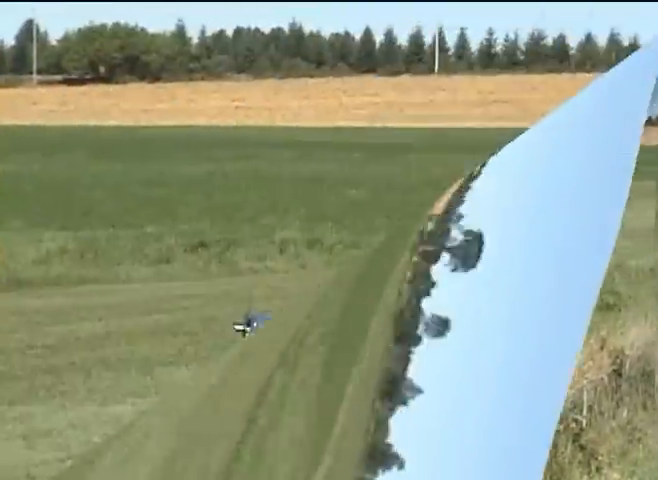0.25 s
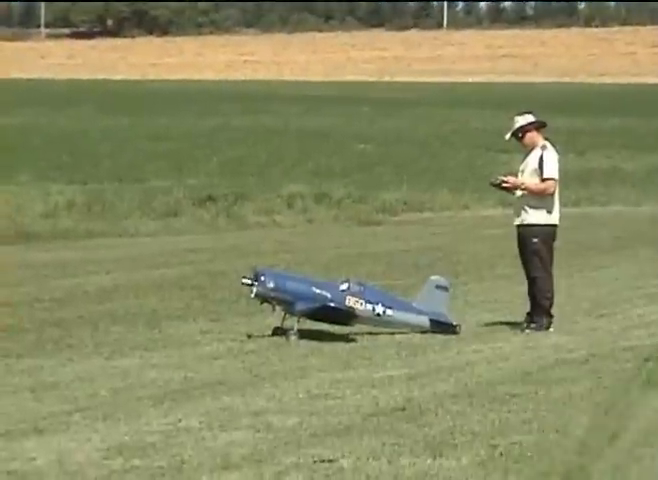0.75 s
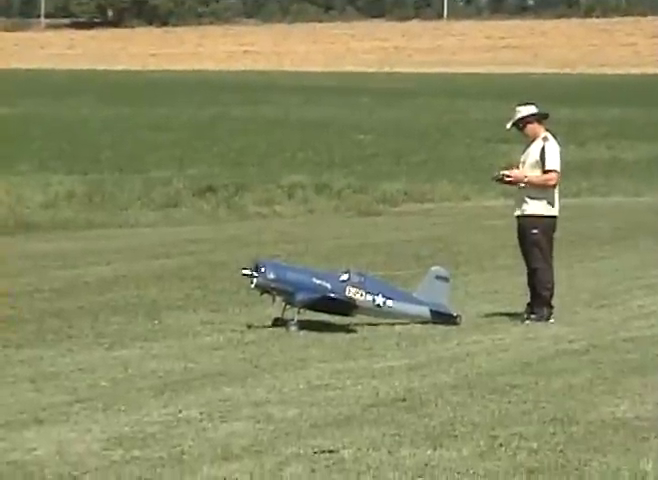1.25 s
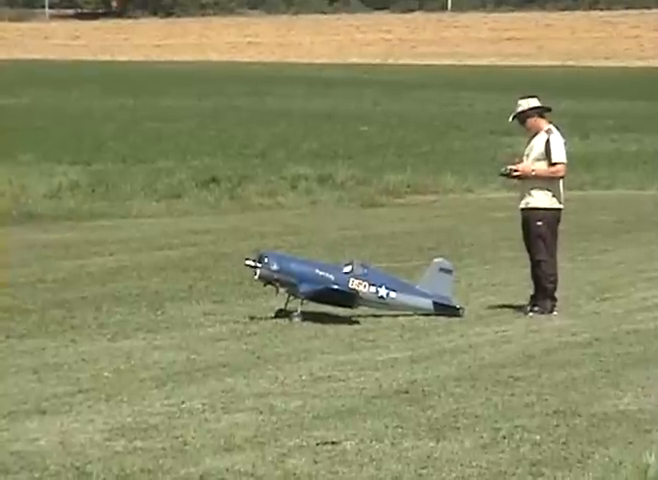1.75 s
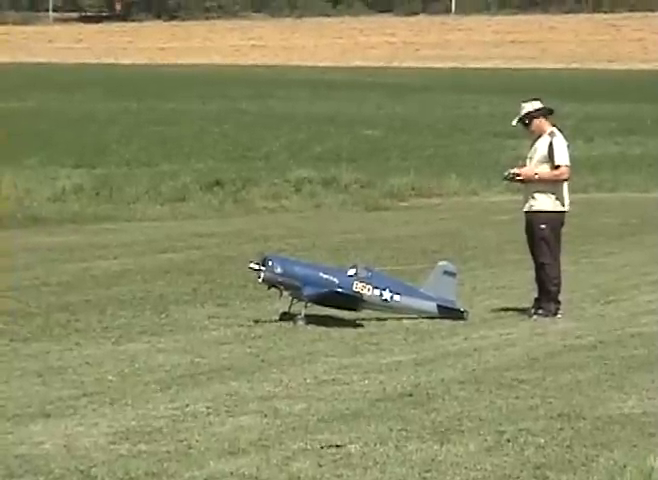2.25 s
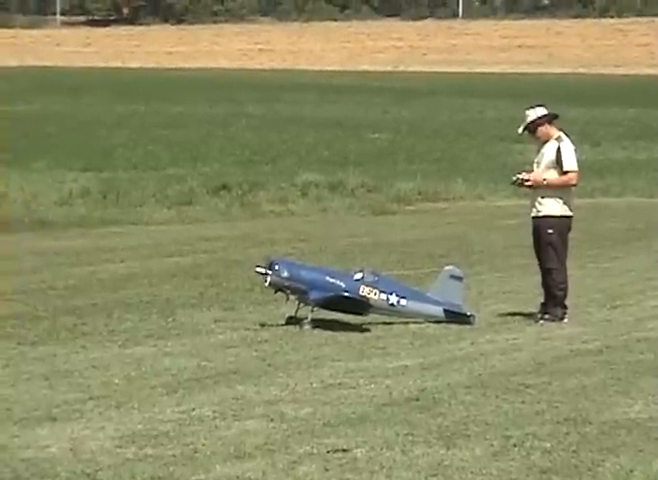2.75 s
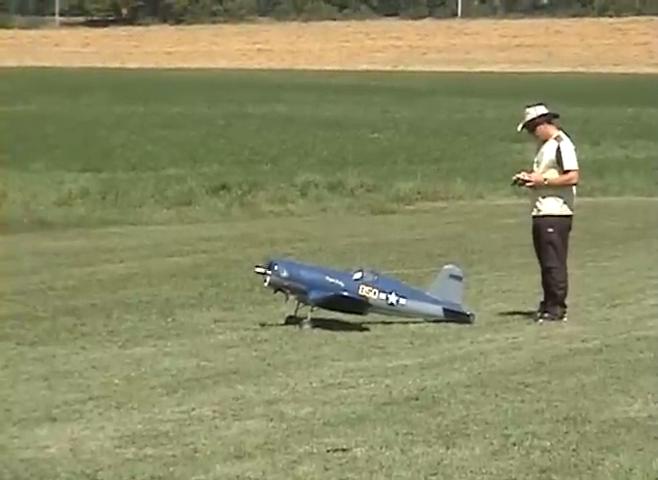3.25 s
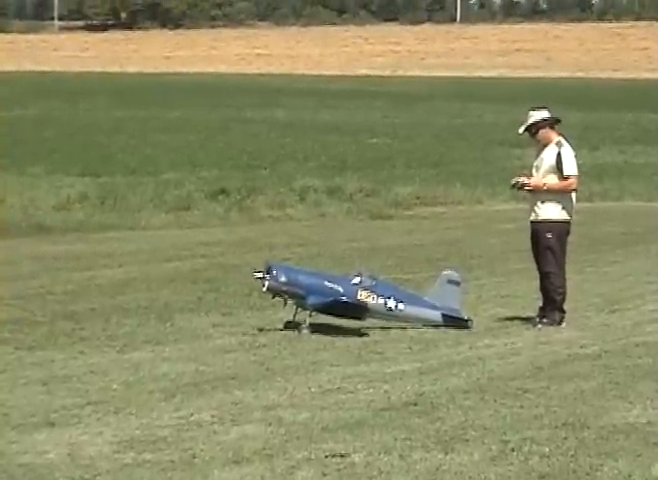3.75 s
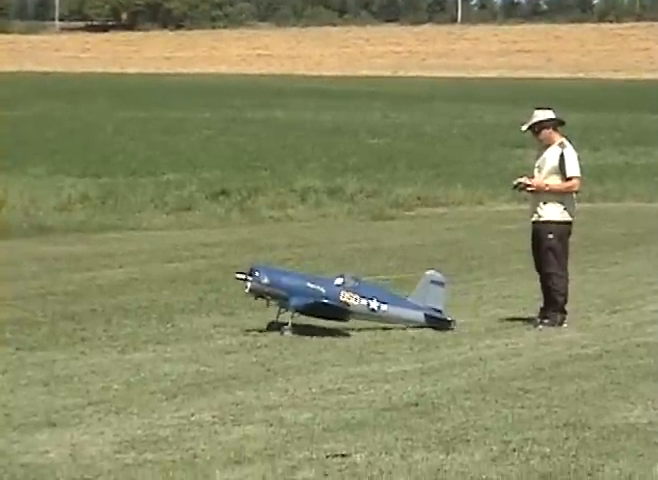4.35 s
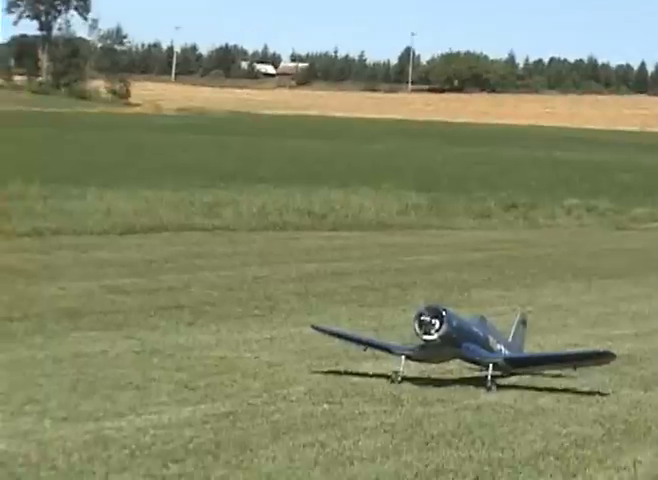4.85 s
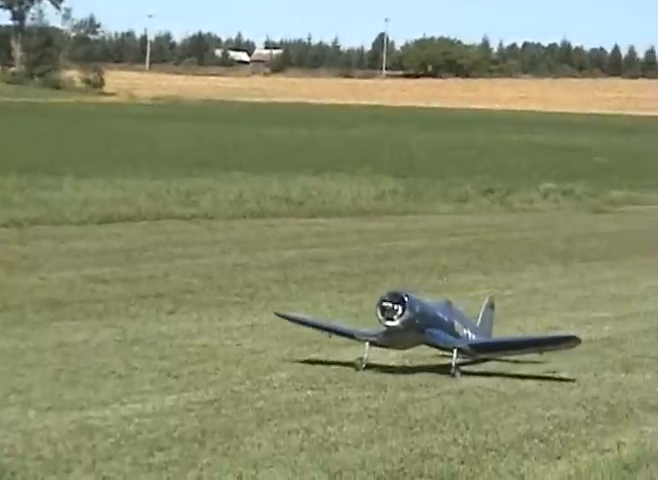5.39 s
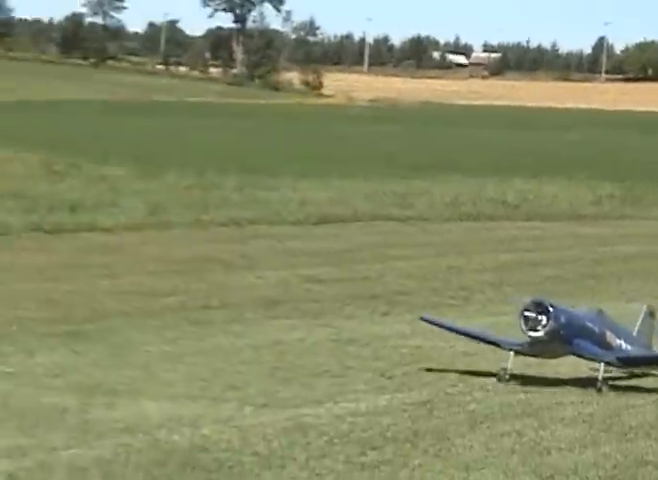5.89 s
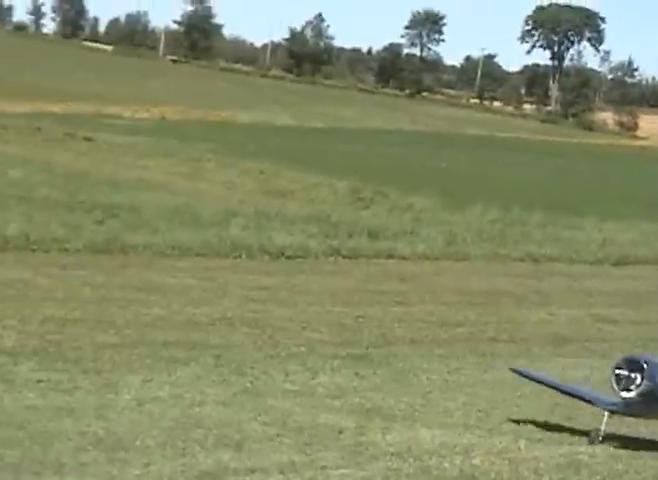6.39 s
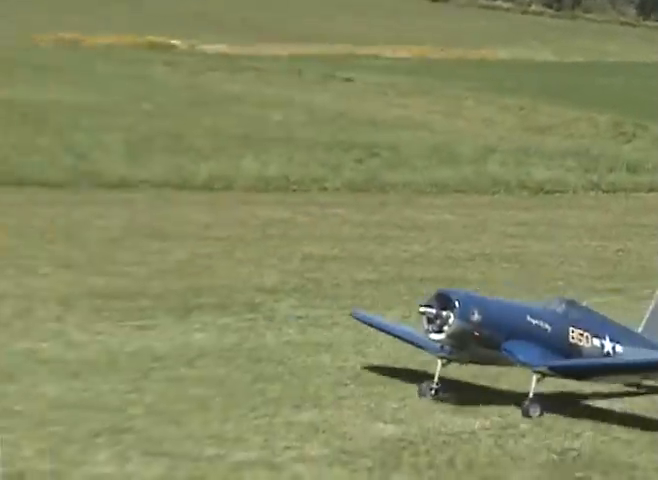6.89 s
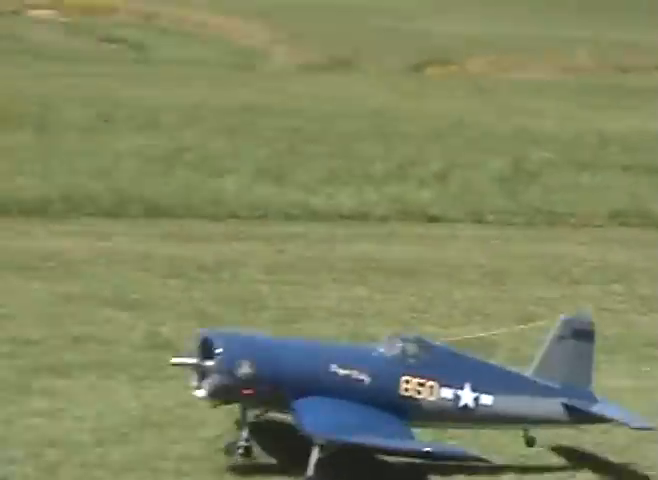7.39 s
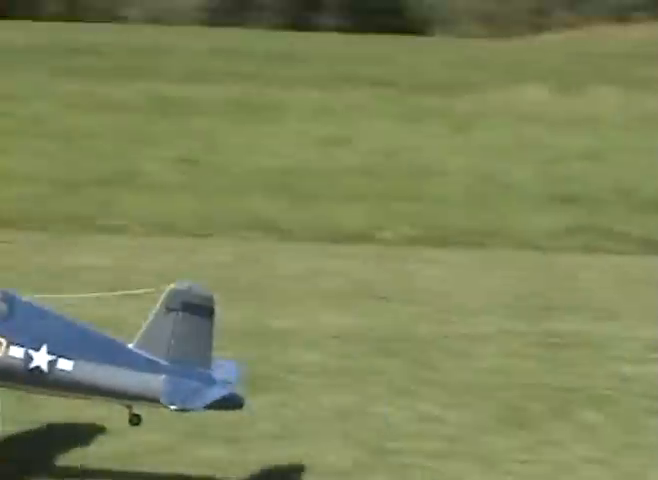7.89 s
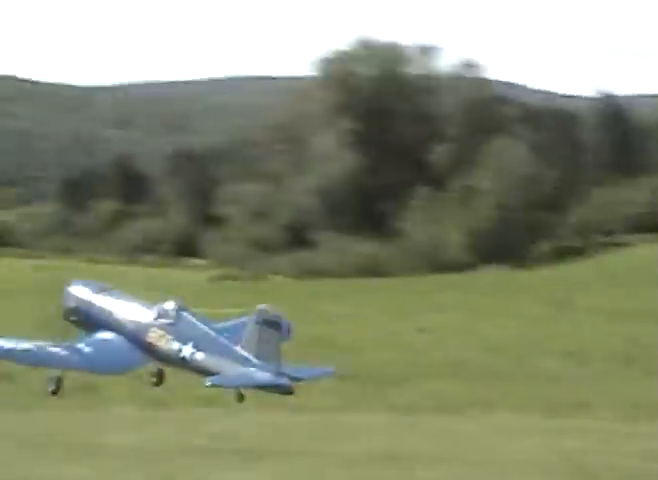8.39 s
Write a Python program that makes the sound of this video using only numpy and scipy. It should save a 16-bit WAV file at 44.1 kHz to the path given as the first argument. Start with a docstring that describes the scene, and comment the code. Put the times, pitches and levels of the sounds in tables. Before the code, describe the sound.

Soft open-field air and thin, high cricket trills lie under everything, with a nearer cricket chirping in short bursts. From 0 s a small two-stroke model plane engine idles: hollow low pops, slightly irregular, about fifteen a second, with a faint propeller thrum. A brighter, noisy engine rasp fades out by 1 s. A tiny wind puff touches the microphone near 2 s. Around 3.7 s the idle quickens, firing faster and unevenly with a low hum. At 4.7 s the throttle snaps open: crackling, spluttering misfires, then the pitch climbs in steps, thumps merging into a drone by 5.8 s. It holds near 6.3-6.9 s, rises again to about 7.5 s, loud, metallic and hissing as the plane passes close. A resonance in the rasp rises, then slides down; by 8.5 s the hiss and buzz dull while a strong hollow bark continues to the end.

```python
"""A grass field with soft air and crickets, heard through two microphone ports. From the start a model
aeroplane's two-stroke idles, its clicks at uneven firings ringing its silencer; a separate brighter, noisier
engine sound, made of shaped noise, fades within about a second. Near 3.7 s the idle quickens and hums. At 4.7 s
the throttle snaps open; one pulse a turn drives bark, buzz and jet noise, stumbling, then winding up. The low
thumps merge into a drone; the exhaust turns from nose-on to side-on, and ends tail-on."""
import sys
import numpy as np
from scipy import signal
from scipy.fft import rfft, irfft, next_fast_len
from scipy.io import wavfile
from scipy.ndimage import uniform_filter1d

SR = 44100
rng = np.random.default_rng(int(sys.argv[2]) if len(sys.argv) > 2 else 0)


def inscribe(sig):
    """Save sig as 16-bit PCM at rate SR to the path in sys.argv[1].

    A 1-D sig is mono; a 2-D sig holds one channel per row.
    Samples are clipped to [-1, 1] before scaling.
    """
    pcm = np.round(np.clip(np.atleast_2d(sig).T, -1, 1) * 32767)
    wavfile.write(sys.argv[1], SR, pcm.astype(np.int16))


N = 380583
TIME = np.arange(N) / SR

# open air of the field: [freq_hz, relative_db]
FIELD_AIR = [(20, -9), (60, 4.5), (130, 1.5), (350, -12.5), (520, -7.5), (780, -6), (1300, -8.5),
             (2300, -16), (4300, -21.5), (5200, -12.5), (6800, -29.5), (8600, -12.5), (9800, -26),
             (14000, -39)]
# low puff of wind on the microphone: [freq_hz, relative_db]
GUST_COLOUR = [(15, -19), (40, -5), (80, -4), (160, -14), (600, -70)]
# small sharp ticks: [start_s, relative_db], and their colour: [freq_hz, relative_db]
TICKS = [(4.0092, -25.5), (6.5214, -22), (8.3459, -33)]
TICK_COLOUR = [(500, -20), (3000, 4), (14000, 3)]
# wing-stroke bursts of the near cricket: [first_stroke_s, last_stroke_s, relative_db]
CRICKET_BURSTS = [(.115, 0.15, -34), (.81, .885, -46), (1.274, 1.346, -42), (1.917, 2.035, -43.5),
                  (2.533, 2.675, -47), (2.703, 2.785, -37), (2.939, 3.013, -44), (3.344, 3.449, -34),
                  (3.646, 3.674, -45), (4.154, 4.226, -35.5)]
STROKES_PER_S = 28

# crank speed at idle: [time_s, turns_per_s]
IDLE_SPEED = [(0, 55.5), (.66, 64), (.72, 39.5), (1.7, 40.7), (2.2, 44), (3.73, 43), (3.93, 56.6),
              (4.67, 58)]
# runs of even firing at idle, with misses between:
# [first_firing_s, last_firing_s, turns_per_firing, relative_db]
FIRING_RUNS = [(.0428, .317, 3, -17.5), (.4252, .637, 3, -18), (.6695, .691, 1, -19.5),
               (.7172, .931, 3, -20), (.9553, 1.3159, 3, -17), (1.41, 1.7018, 3, -16),
               (1.751, 2.038, 3, -14), (2.108, 2.247, 3, -14.5), (2.269, 2.3409, 3, -15.5),
               (2.3648, 2.932, 3, -13.7), (3.002, 3.4183, 3, -13), (3.51, 3.5805, 3, -13),
               (3.6036, 3.6742, 3, -14.5), (3.7215, 3.9403, 1, -14), (3.974, 3.9918, 1, -12),
               (4.0259, 4.0783, 1, -12), (4.113, 4.1647, 1, -11.5), (4.2166, 4.2837, 2, -10),
               (4.3359, 4.3696, 2, -10), (4.4217, 4.4737, 1, -13), (4.5082, 4.56, 3, -11.5),
               (4.5952, 4.6137, 1, -11.5), (4.6658, 4.6658, 1, -11.5)]
# silencer at idle, propeller thrum, spitting outlet, noisy opening engine sound: each [freq_hz, relative_db]
IDLE_PIPE = [(30, -34), (60, -43), (85, -27.5), (115, 1), (170, 3.5), (250, -2), (400, -4), (510, -17.5),
             (720, -12.5), (1200, -33), (1900, -26), (2400, -71), (5000, -68)]
THRUM = [(40, -20), (85, -6), (125, 3), (170, 3), (215, 6.5), (300, 1), (380, -4), (500, -19), (750, -11),
         (1300, -30), (3000, -54)]
SPIT = [(700, -25), (1200, 9.5), (1900, -4), (2600, -4), (3500, 1.5), (4400, -12), (5600, 6), (6800, -4),
        (10000, -5), (14000, -24)]
OPENING_NOISE = [(260, -44), (450, -5), (505, -17), (673, -2.5), (835, -2), (1110, -15), (1210, -9.5),
                 (1380, -14.5), (5260, -16.5), (5910, -20.5), (9630, -24.5), (13000, -41), (14000, -55)]

OPEN_S = 4.678  # the throttle snaps open
RUN_UP_S = OPEN_S - .0005  # open-throttle sound is silent before this
# crank speed with the throttle open: [time_s, turns_per_s]
OPEN_SPEED = [(4.68, 59.3), (4.84, 60.0), (4.9, 60.5), (5.08, 68.4), (5.19, 72.9), (5.26, 73.7),
              (5.38, 73.8), (5.6, 77.3), (5.83, 88.0), (5.94, 92.8), (6.2, 102.8), (6.31, 103.2),
              (6.69, 102.9), (6.94, 106.5), (7.2, 114.6), (7.48, 117.0), (7.57, 117.3), (8.63, 114.2)]
# misfires while the engine clears: [time_s, change_db]
STUMBLES = [(4.713, -25), (4.747, -26), (4.779, -10), (4.813, -11), (4.864, -18), (4.946, -20),
            (5.069, -13), (5.318, -9), (5.346, -13), (5.373, -14)]
REBOUND_DB = 2.5  # the turn after a misfire burns a double charge
JET_LAG_S = 0.000803  # the jet and its rasp follow the first pressure step
# whistling crack in the outlet: [freq_hz, relative_db]
CRACK = [(1500, -23), (3000, 2), (4600, -11), (6000, 7.5), (7000, -36), (13000, -20)]
# silencer with the throttle open: [freq_hz, relative_db]
OPEN_PIPE = [(30, -20), (70, -13), (110, -1), (160, 8), (230, 7), (290, -9.5), (360, 6.5), (440, -4.5),
             (520, -10.5), (700, -41.5)]
THUMP_DB, THUMP_DB_PER_OCTAVE = -17, 8  # at the first crank speed; rise with each doubling of it
# drone on the crank orders: [time_s, order_1_db, order_2_db, order_3_db, order_4_db]
DRONE = [(5.78, -57, -20.5, -16.5, -18.5), (5.83, -41, -17.5, -18, -22.5), (5.97, -27, -17.5, -15.5, -27),
         (6.7, -29.5, -15.5, -14, -26), (7.09, -27, -21, -13.5, -27.5), (7.43, -21.5, -18.5, -11.5, -21),
         (7.76, -21, -12, -20, -22), (8.17, -27.5, -18, -17, -31), (8.63, -33, -32, -25, -33.5)]
# mean levels of crank orders 5 and 6: [level_db]
UPPER_DRONE = [-36, -33.5]

# which way the aeroplane faces: [time_s, heading], 0 nose-on, 1 oblique, 2 side-on, 3 tail-on
HEADING = [(5.5, 1), (5.8, 0), (6.05, 0), (6.25, 1), (6.8, 1), (7.3, 2), (7.8, 2), (8.45, 3)]
# exhaust colour at those four headings: each [freq_hz, relative_db]
BARK_NOSE = [(400, -19), (530, -11), (680, 13), (820, -2), (1000, 18), (1150, -6), (1350, -6), (1600, -22),
             (2200, -29)]
BARK_OBLIQUE = [(380, -25), (520, -5.5), (620, 0), (730, 9.5), (830, 5), (930, 1.5), (1040, -2),
                (1200, -18), (1600, -13.5), (2200, -15)]
BARK_ABEAM = [(400, -22), (585, -11), (700, 7), (820, 8.5), (935, 7), (1050, -1), (1170, 10.5), (1400, 2.5),
              (1600, 6.5), (2100, -23)]
BARK_BEHIND = [(400, -45.5), (570, -10.5), (690, 5), (805, -4), (920, 9.5), (1035, -3.5), (1150, -7),
               (1280, -21), (1550, -16), (2100, -34.5)]
# exhaust bark: [time_s, level_db]
BARK_LEVEL = [(4.7, -29), (4.84, -30), (5.94, -20), (6.34, -27.5), (6.63, -23.5), (7.71, -24),
              (7.98, -15.5), (8.63, -14.5)]
# metallic buzz and jet hiss colours: each [freq_hz, relative_db]
BUZZ = [(100, -12.5), (600, -8), (1100, -4.5), (1450, -8.5), (1800, -4.5), (2150, -4.5), (2450, -9.5),
        (2850, -5.5), (3250, -9), (3700, -5.5), (4300, -14.5), (5500, -14.5)]
HISS = [(2400, -27), (4000, -3), (4800, -3), (5500, 0), (6300, 1), (7300, -3), (9000, -6), (10500, -12),
        (12500, -19), (14000, -30)]
# relative level of buzz and low roar: [time_s, relative_db]
BUZZ_LEVEL = [(4.7, -28.5), (5.26, -20.5), (5.36, -23), (6.05, -19), (6.15, -22.5), (6.86, -21.5),
              (7.7, -21.5), (8.45, -31), (8.63, -29.5)]
# jet hiss: [time_s, level_db]
HISS_LEVEL = [(4.7, -27.5), (5.64, -26.5), (5.91, -21), (6.81, -24), (6.83, -26), (7.75, -24), (7.99, -30),
              (8.63, -36)]
# treble shading by the fuselage seen from behind, and the low roar: each [freq_hz, relative_db]
HISS_SHADE = [(4000, -5.0), (8000, -5), (10000, -4.0), (13000, -5)]
BUZZ_SHADE = [(1500, 1.0), (2100, -2.5), (2800, -2.5), (4500, -3.5)]
ROAR = [(25, -21), (90, -14), (200, -2.5), (400, 8.0), (600, -37), (1200, -28)]

# two ringing bands of the silencer can: each [freq_hz, relative_db]
CAN_LOWER = [(1600, -46), (1980, -14), (2150, 6), (2240, 11), (2360, -22), (2800, -39)]
CAN_UPPER = [(2200, -34.0), (2600, -1), (2780, -2), (2950, 2), (3100, -7), (3600, -26.0)]
# their swells as the aeroplane turns: [peak_s, half_length_s, peak_db]
LOWER_SWELLS = [(6.42, .33, -30), (7.62, 0.3, -27.5)]
UPPER_SWELLS = [(7.13, 0.097, -27)]
# broad resonance that slides in the rasp: [time_s, pitch_hz]
SWEEP = [(7.1, 1170), (7.65, 1710), (7.95, 1310), (8.2, 1120), (8.63, 840)]
# its swells: [peak_s, half_length_s, peak_db]
SWEEP_SWELLS = [(7.3, 0.54, -29), (8.1, 0.38, -27)]

# likeness of the two microphone ports: [freq_hz, correlation], later held within 0 to 1
PORT_LIKENESS = [(30, -3), (120, 0.23), (600, 0.91), (2000, 0.6), (5000, 0.83), (8000, 0.63), (12000, -0.5)]
# balance of the ports: [freq_hz, left_minus_right_db]
PORT_TILT = [(100, 0), (1100, 1.06), (2200, -2), (4000, -1), (8000, 2), (12500, -8.5)]
EDGE_HZ = 13500  # top of the recorded band


def amp(db):
    """Decibels to gain."""
    return 10 ** (np.asarray(db) / 20)


def read(points, hz):
    """A spectrum joined by straight lines over log frequency."""
    f, value = np.transpose(points)
    return np.interp(np.log(hz + 1), np.log(f + 1), value)


def curves(rows):
    """Each column of a table, sample by sample."""
    s, *columns = np.transpose(rows)
    return [np.interp(TIME, s, column) for column in columns]


def swells(rows):
    """Gain that rises and falls in a bell around each peak."""
    return sum(amp(db) * np.exp(-((TIME - s) / length) ** 2) for s, length, db in rows)


def add(mix, s, sound):
    """Mixes a sound in at time s."""
    part = mix[max(round(s * SR), 0):][:len(sound)]
    part += sound[:len(part)]


def evened(x):
    """Scaled to unit power."""
    return x / np.sqrt(np.mean(x ** 2) + 1e-20)


def steadied(x, start, size=6001):
    """Unit power over about a seventh of a second, silent before start."""
    on = TIME >= start
    power = uniform_filter1d(np.atleast_2d(x ** 2).mean(0) * on, size)
    power /= np.maximum(uniform_filter1d(on * 1., size), .01)
    return x * on / np.sqrt(abs(power) + 1e-12)


def running(x):
    """Steadied sound of the engine with the throttle open."""
    return steadied(x, RUN_UP_S)


def response(points, size=4096):
    """The causal, minimum-phase ring of a body with this spectrum, falling steeply above its last point."""
    hz = abs(np.fft.fftfreq(size, 1 / SR))
    db = read(points, hz) - 30 * np.log2(np.maximum(hz / points[-1][0], 1))
    log_gain = np.log(amp(np.maximum(db, -100)))
    return np.fft.ifft(np.exp(np.conj(signal.hilbert(log_gain)))).real[:size // 2]


def colour(x, points):
    """Passes x through a body with this spectrum."""
    return signal.oaconvolve(np.atleast_2d(x), response(points)[None], axes=1)[:, :N]


def noise():
    """White noise at the two ports, whose likeness varies with frequency."""
    size = next_fast_len(N, real=True)
    same = np.clip(read(PORT_LIKENESS, np.fft.rfftfreq(size, 1 / SR)), 0, 1)
    mid, side = rfft(rng.standard_normal((2, size))) * np.sqrt([(1 + same) / 2, (1 - same) / 2])
    return irfft(np.array([mid + side, mid - side]), size)[:, :N]


def pulses(times, sizes, order=8):
    """Band-limited clicks placed between samples by windowed sincs."""
    at = times[:, None] * SR
    near = np.floor(at).astype(int) + np.arange(-order, order + 1)
    shape = np.sinc(near - at) * np.sinc((near - at) / (order + 1))
    return np.bincount(np.clip(near, 0, N).ravel(), (sizes[:, None] * shape).ravel(), N + 1)[:N]


def puffs(train, decay):
    """Gas flow after each click: a quick rise and a slower fall, decay in seconds."""
    u = np.arange(SR // 10) / SR / decay
    return signal.oaconvolve(train, np.exp(-u) * (1 - np.exp(-10 * u)))[:N]


def drift(per_s, count=24):
    """Slow random wandering of unit power, from sines up to per_s cycles a second."""
    t = np.linspace(0, N / SR, 2000)
    hz = np.geomspace(per_s / 10, per_s, count)[:, None]
    waves = np.sin(2 * np.pi * (hz * t + rng.random((count, 1)))) / np.sqrt(hz)
    return np.interp(TIME, t, evened(waves.sum(0)))


def mode(x, hz, t60):
    """One damped resonance struck by x, losing 60 dB in t60 seconds."""
    t = np.arange(SR // 5) / SR
    return signal.oaconvolve(x, np.sin(2 * np.pi * hz * t) * amp(-60 * t / t60))[:N]


def field():
    """Soft outdoor air as shaped noise, one gust on the microphone and a few ticks."""
    air = amp(-44 + 0.78 * drift(14)) * evened(colour(noise(), FIELD_AIR))
    gust = evened(colour(noise(), GUST_COLOUR))
    gust *= amp(-37) * np.exp(-((TIME - 1.95) / .06) ** 2)
    s, db = np.transpose(TICKS)
    ticks = colour(noise() * puffs(pulses(s, amp(db)), decay=0.0014), TICK_COLOUR)
    return air + gust + ticks


def chirp(hz, length, fall):
    """One wing stroke of a cricket: the pitch sags as the wing slows."""
    u = np.arange(0, 1, 1 / (length * SR))
    phase = 2 * np.pi * np.cumsum(hz * (1 - fall * (2 * u - .5) ** 2)) / SR
    return np.sin(np.pi * u) * (np.sin(phase) + 0.049 * np.sin(2 * phase))


def trill(hz, per_s, length, fall, db, spread_db):
    """A cricket further off, stroking steadily with small chances of timing, strength and pitch."""
    out = np.zeros(N)
    for k, (late, size, pitch) in enumerate(rng.standard_normal((int(per_s * N / SR), 3))):
        stroke = chirp(hz * (1 + .008 * pitch), length, fall)
        add(out, (k + 0.24 * late) / per_s, amp(db + spread_db * size) * stroke)
    return out


def crickets(near_db=1):
    """Bursts of wing strokes from one near cricket over three distant trills."""
    near = np.zeros(N)
    for first, last, db in CRICKET_BURSTS:
        for s in np.linspace(first, last, round((last - first) * STROKES_PER_S) + 1):
            gain = amp(db + near_db + 2.1 * rng.standard_normal())
            add(near, s, gain * chirp(hz=5300 + 50 * rng.standard_normal(), length=0.019, fall=0.047))
    low = trill(hz=5430, per_s=23, length=0.021, fall=0.066, db=-47, spread_db=3.5)
    high = trill(hz=8870, per_s=22.0, length=0.022, fall=0.016, db=-51, spread_db=1.0)
    far = trill(hz=8700, per_s=31, length=0.023, fall=0.029, db=-54.5, spread_db=5.5)
    # left and right levels in dB
    return (near + low) * amp([[-2], [1.5]]) + high * amp([[2], [-3]]) + far * amp([[-4], [3]])


def idle_firings(spread_db=0.56):
    """Times and strengths of idle firings: within a run they fall on every first, second or third turn."""
    turns = np.cumsum(curves(IDLE_SPEED)[0]) / SR
    rows = []
    for first, last, every, db in FIRING_RUNS:
        a, b = np.interp([first, last], TIME, turns)
        count = round(abs(b - a) / round(every)) + 1
        rows += [(s, db) for s in np.interp(np.linspace(a, b, count), turns, TIME)]
    s, db = np.transpose(rows)
    return s, db + spread_db * rng.standard_normal(len(s))


def idle_turns(s):
    """Unfired turns between the firings, and the half-turns at which propeller blades beat."""
    ends = np.append(s, OPEN_S)
    speed = np.interp(s, *np.transpose(IDLE_SPEED))
    counts = np.maximum(np.round(np.diff(ends) * speed), 1).astype(int)
    turns = [np.linspace(a, b, n + 1) for a, b, n in zip(ends, ends[1:], counts)]
    duds = np.concatenate([t[1:-1] for t in turns])
    duds = np.append([.007, .025], duds)  # two unfired turns lead in
    halves = [(t[1:] + t[:-1]) / 2 for t in turns]
    return duds, np.sort(np.concatenate([s, duds, *halves]))


def idle_pops(s, db, fired, duds):
    """Firings pop in the silencer and swing back once in the pipe; unfired turns puff softly."""
    soft = pulses(duds, amp(-27 + 2 * rng.standard_normal(len(duds))))
    soft += pulses(s + 0.01274, amp(db - 11))  # the return swing
    soft = signal.lfilter(*signal.butter(1, 500, fs=SR), soft)  # a slow push has little edge
    return -colour(fired + soft, IDLE_PIPE) / np.ptp(response(IDLE_PIPE))


def propeller_thrum(blades):
    """Uneven blade beats, alternately stronger and weaker, ring a low body."""
    chance = rng.standard_normal((len(blades), 2))
    sizes = amp(2 * chance[:, 1]) * (1 + 0.11 * (-1) ** np.arange(len(blades)))
    beats = pulses(blades + 0.00414 + 0.00086 * chance[:, 0], sizes)
    level_db = -38 + np.interp(TIME, [.5, 1, 3.7, 4], [-3.5, -1.5, 1, 2.4])
    return amp(level_db) * evened(colour(beats, THRUM))


def idle(s, db):
    """Pops, a ringing silencer and spitting gas follow each firing while the propeller thrums and hums."""
    duds, blades = idle_turns(s)
    fired = pulses(s - 0.00046, amp(db))
    pops = idle_pops(s, db, fired, duds)
    thrum = propeller_thrum(blades)
    # the silencer's air rings on
    boom = amp(-24.0) * mode(fired * np.interp(TIME, [3.6, 3.9], [.4, 1]), hz=164.0, t60=0.083)
    spit = amp(-22) * colour(noise() * puffs(fired, decay=0.008), SPIT)
    return pops + boom + thrum + idle_hum(np.sort(np.append(s, duds))) + spit


def opening_noise(s, db):
    """A noisy idling-engine sound, shaped noise that snaps with each firing, fading out in about a second."""
    snaps = puffs(pulses(s, amp(db - FIRING_RUNS[0][3])), decay=0.0014)
    flicker = amp(1.4 * drift(60.6)) * (1 + 3.9 * snaps)
    fade = amp(-30.5 - 13 * TIME) * np.interp(TIME, [0.83, 1.04], [1, 0])  # sinks 13 dB a second
    return fade * steadied(colour(noise() * flicker, OPENING_NOISE), 0)


def idle_hum(turn_times):
    """The propeller hums on crank orders 3 and 4, which enter once the idle quickens."""
    phase = 2 * np.pi * np.interp(TIME - 0.00021, turn_times, np.arange(len(turn_times)))
    hum = sum(amp(db + 4.0 * drift(12)) * np.sin(k * phase) for k, db in enumerate([-34, -37], 3))
    return np.sqrt(2) * hum * np.interp(TIME, [3.7, 3.88], [0, 1]) * (TIME < OPEN_S)


def open_firings(turns):
    """One firing a turn, some misfired: times, strengths in dB and further chances for jitter."""
    s = np.interp(np.arange(int(turns[-1]) + 1) + 1e-6, turns, TIME)
    chance = rng.standard_normal((len(s), 3))
    db = np.interp(s, [5, 5.6], [.8, .5]) * chance[:, 0]  # the burns even out as the engine clears
    for when, change_db in STUMBLES:
        turn = np.argmin(abs(s - when))
        db[turn] += change_db
        db[turn + 1] += REBOUND_DB
    return s, db, chance[:, 1:]


def scatter(x, share, spread, count=4):
    """Short reflections off wings and ground, random decaying taps whose shares drift."""
    t = np.arange(SR // 60) / SR
    out = x.copy()
    for _ in range(count):
        taps = rng.standard_normal(len(t)) * np.exp(-t / spread)
        reflected = signal.oaconvolve(x, taps / np.linalg.norm(taps))[:N]
        out += share * drift(1.509) * reflected / np.sqrt(count)
    return out


def outlet_crack(train):
    """The first rich firings crack and whistle in the outlet as short noise puffs."""
    crack = colour(noise() * puffs(train, decay=0.0037), CRACK)
    return crack * amp(-9) * np.interp(TIME, [4.94, 5.04], [1, 0])


def low_note(train, turns, hz):
    """Separate thumps in the silencer merge into a drone on the lowest six crank orders."""
    merged = np.interp(TIME, [5.66, 5.76], [0, 1])
    pipe = running(-colour(train, OPEN_PIPE)) + 0.19 * running(mode(-train, hz=178, t60=0.13))
    thump = amp(THUMP_DB + THUMP_DB_PER_OCTAVE * np.log2(hz / hz[0])) * running(pipe)
    ring = rfft(-response(OPEN_PIPE))
    lag = np.unwrap(np.angle(ring))  # each order keeps the silencer's phase
    ring_hz = np.linspace(0, SR / 2, len(ring))
    drone = 0
    for k, db in enumerate(curves(DRONE) + list(UPPER_DRONE), 1):
        phase = 2 * np.pi * k * turns + np.interp(k * hz, ring_hz, lag)
        drone = drone + np.sqrt(2) * amp(db + 0.5 * drift(25)) * np.cos(phase)
    return (1 - merged) * thump + merged * drone


def exhaust_bark(train, jet, heading):
    """Pulses and jet noise ring the airframe, cross-fading between four colours with the heading."""
    # the tone is roughest while the propeller bites into still air
    rough = np.interp(TIME, [4.7, 5.5, 5.95, 6.2, 7.3, 8.3], [.4, .36, .33, .3, .3, .24])
    drive = np.sqrt(1 - rough ** 2) * running(scatter(train, .42, spread=.003)) + rough * jet
    bodies = [BARK_NOSE, BARK_OBLIQUE, BARK_ABEAM, BARK_BEHIND]
    bark = sum(np.maximum(1 - abs(heading - k), 0) * running(colour(drive, body))
               for k, body in enumerate(bodies))
    return amp(curves(BARK_LEVEL)[0]) * running(bark)


def metallic_buzz(whine, jet, behind):
    """Scattered pulses and gritty jet noise buzz in the metal, shaded in treble from behind."""
    grit = np.interp(TIME, [6, 6.2, 7.7, 8.2], [.85, .68, .55, .8])
    buzz = colour(np.sqrt(1 - grit ** 2) * whine + grit * jet, BUZZ)
    buzz += behind * (colour(buzz, BUZZ_SHADE) - buzz)
    return amp(curves(BUZZ_LEVEL)[0] + 1.52) * running(buzz)


def jet_hiss(blasts, whine, behind):
    """Fine noise, strongest while the port blows down, joins the whine; the fuselage shades it."""
    blowdown = running(noise() * (puffs(blasts, decay=.003) + .2))
    hiss = colour(blowdown + 0.59 * whine, HISS)
    hiss += behind * (colour(hiss, HISS_SHADE) - hiss)
    return amp(curves(HISS_LEVEL)[0]) * running(hiss)


def low_roar(jet):
    """The jet's turbulence in a low band, following the buzz in level."""
    return amp(curves(BUZZ_LEVEL)[0] - 10) * running(colour(jet, ROAR))


def can_ring(clean):
    """Two bands of the silencer can ring, swelling and fading as the aeroplane turns."""
    lower = swells(LOWER_SWELLS) * running(colour(clean, CAN_LOWER))
    return lower + swells(UPPER_SWELLS) * running(colour(clean, CAN_UPPER))


def resonate(x, hz, width):
    """A resonance that follows the curve hz: shift to zero, smooth, shift back."""
    turn, r = np.exp(2j * np.pi * np.cumsum(hz) / SR), np.exp(-np.pi * width / SR)
    return 2 * (turn * signal.lfilter([1 - r], [1, -r], x / turn + 1e-18)).real


def sweep(drive, width_hz=420):
    """A resonance in the rasp rises, then slides down in pitch as the aeroplane passes."""
    hz = curves(SWEEP)[0]
    once = resonate(drive, hz, width_hz)
    return swells(SWEEP_SWELLS) * running(resonate(once, hz, width_hz))


def full_throttle():
    """One exhaust pulse a turn rings silencer and airframe and drives a burst of jet noise."""
    hz = curves(OPEN_SPEED)[0]
    turns = np.cumsum(hz * (TIME >= RUN_UP_S)) / SR
    s, db, chance = open_firings(turns)
    train = pulses(s + JET_LAG_S + 1.5e-5 * chance[:, 0], amp(db))
    blasts = pulses(s + JET_LAG_S, amp(db + 1.6 * chance[:, 1]))
    # propeller turbulence fills the gaps as the speed grows
    flow = puffs(blasts, decay=0.033) + (hz / 80) ** 2
    jet = running(noise() * flow)
    whine = running(scatter(train, 3.2, spread=0.013))
    clean = running(train) + 0.37 * jet  # mostly the even part of the pulses
    heading = curves(HEADING)[0]
    behind = np.clip(3 * (heading - 2), 0, 1)
    thumps = pulses(s, amp(.6 * db))  # even a poor burn pushes gas out
    low = outlet_crack(train) + low_note(thumps, turns, hz) + low_roar(jet)
    rasp = exhaust_bark(train, jet, heading) + metallic_buzz(whine, jet, behind)
    return low + rasp + jet_hiss(blasts, whine, behind) + can_ring(clean) + sweep(clean)


def scene():
    """The field, the idle and the take-off run."""
    s, db = idle_firings()
    return field() + crickets() + idle(s, db) + opening_noise(s, db) + full_throttle()


def record(dry):
    """The two ports differ in balance over frequency; the loudest peaks are rounded off; then the band limit."""
    hz = np.fft.rfftfreq(N, 1 / SR)
    ports = irfft(rfft(dry) * amp(read(PORT_TILT, hz) * np.array([[.5], [-.5]])), N)
    rounded = ports / (1 + (ports / .92) ** 6) ** (1 / 6)
    edge = signal.firwin(301, EDGE_HZ, window=("kaiser", 8), fs=SR)
    return signal.oaconvolve(rounded, edge[None], "same")


dry = scene()
out = record(dry)
inscribe(out)
```